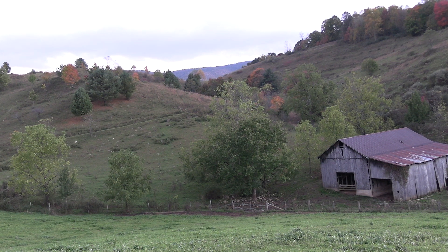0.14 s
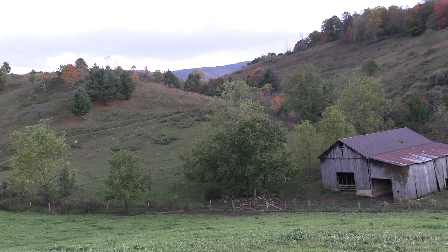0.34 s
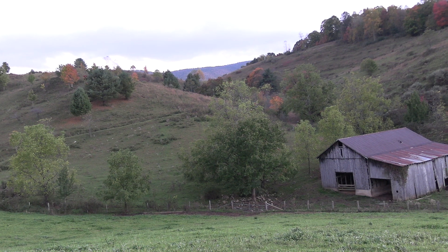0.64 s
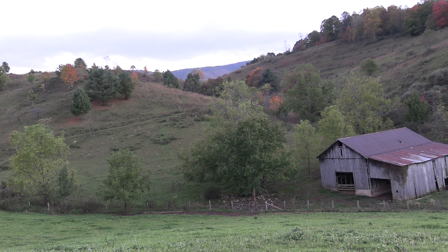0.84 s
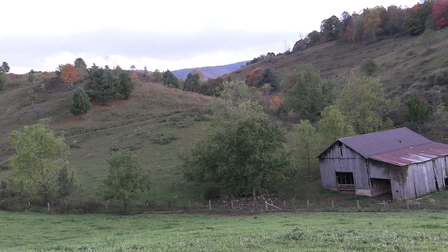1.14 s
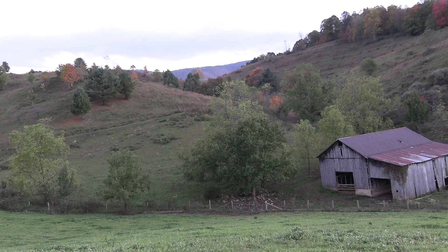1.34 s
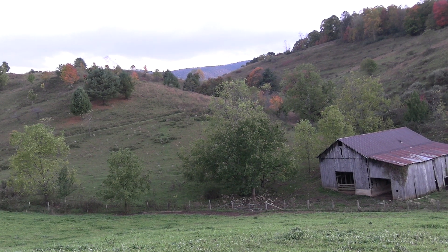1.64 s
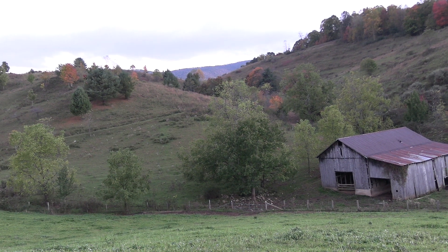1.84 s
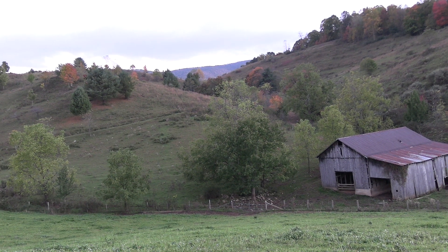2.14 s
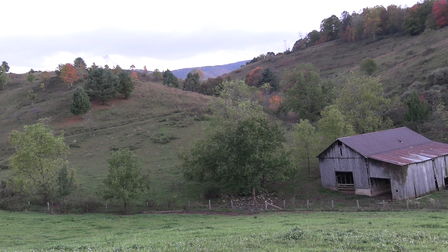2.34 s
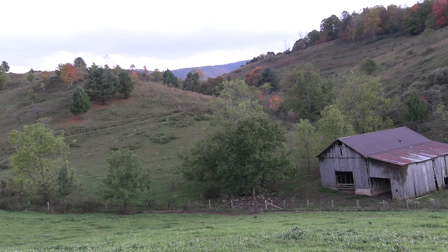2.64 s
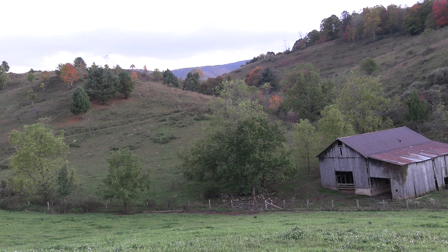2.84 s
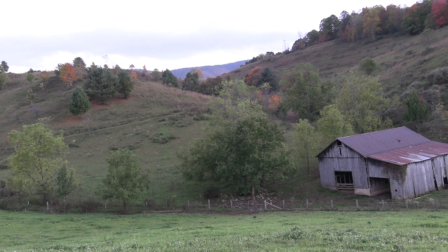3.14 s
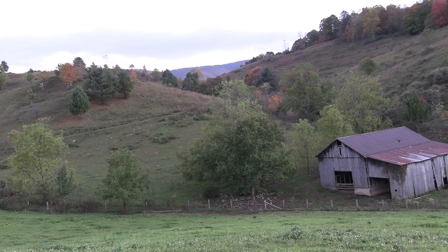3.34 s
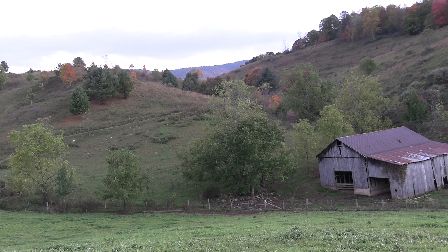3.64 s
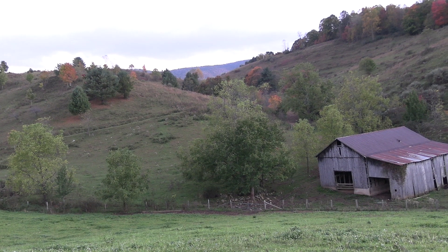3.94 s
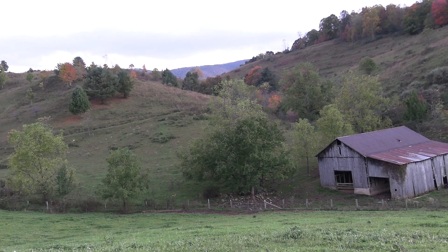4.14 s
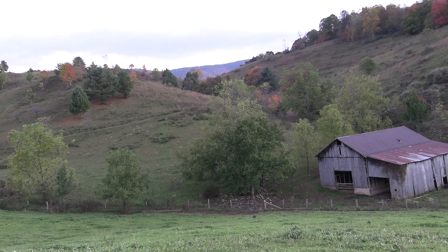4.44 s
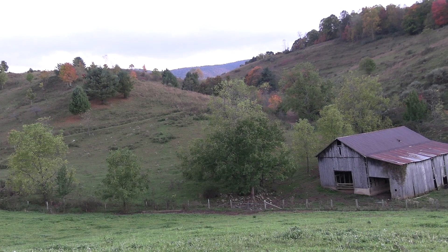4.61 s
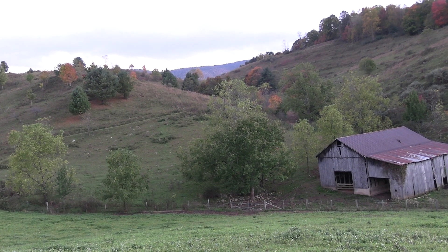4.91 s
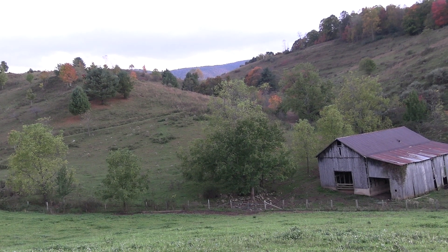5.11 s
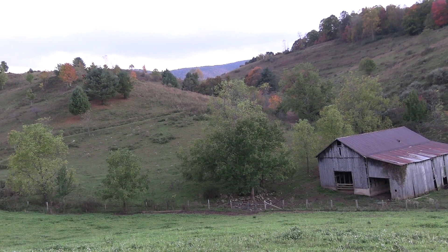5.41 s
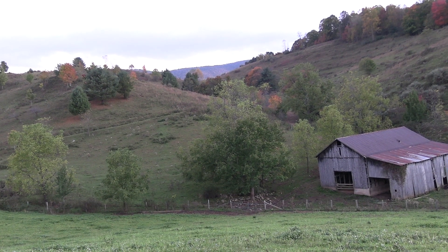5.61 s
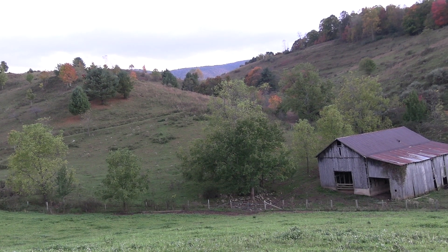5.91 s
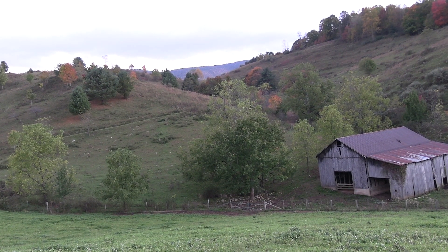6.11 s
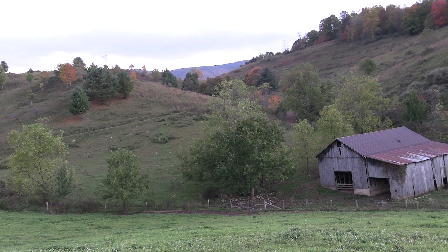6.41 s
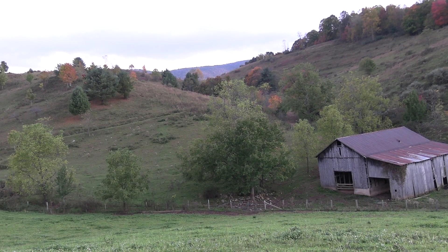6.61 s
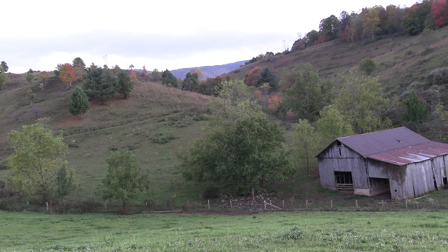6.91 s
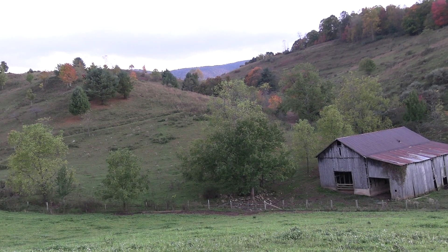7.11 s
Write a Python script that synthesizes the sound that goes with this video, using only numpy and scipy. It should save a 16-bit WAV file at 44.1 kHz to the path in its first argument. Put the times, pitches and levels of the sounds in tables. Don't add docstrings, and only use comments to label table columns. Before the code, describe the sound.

Dusk pasture: short crickets trills and tiny bird chips over faint air, broken by a lone coyote's bark, wavering high howl and final bark.

```python
import sys
import numpy as np
from scipy import signal
from scipy.fft import rfft, irfft
from scipy.io import wavfile
from scipy.ndimage import uniform_filter1d, minimum_filter1d

SR = 44100
rng = np.random.default_rng(int(sys.argv[2]) if len(sys.argv) > 2 else 0)


def volts_from_decibels(level):
    exponent = np.asarray(level, float) / 20
    return 10 ** exponent


def pcm_store(signal):
    levels = np.round(np.clip(np.atleast_2d(signal), -1, 1) * 32767)
    wavfile.write(sys.argv[1], SR, levels.astype(np.int16).T)


N = 320386

# (time [s], pitch [Hz], level [dB], mouth opening [dB])
BARK_END = [(4.145, 509, -31.5, 3), (4.158, 530.4, -21.5, -1.5), (4.184, 537, -20.5, -6),
            (4.226, 505, -23, -6), (4.246, 428, -43, 17.5), (4.262, 533, -36, -13)]
YIP = [(4.264, 542, -49, -13.5), (4.274, 697, -37.5, -5.5), (4.285, 750, -42, 1.5), (4.326, 873, -23, -2.5),
       (4.334, 826, -32.5, 2)]
DIP = [(4.339, 674, -28, 0), (4.387, 653.7, -23, 4), (4.414, 586, -27, -8.5), (4.43, 540, -24, -3.5),
       (4.471, 525, -19.5, 0), (4.489, 560, -17.5, -2.5)]
RISE = [(4.504, 613, -27.5, 4.9), (4.518, 656.5, -24, 6.6), (4.541, 699, -23, 2.31),
        (4.561, 739, -22.5, 4.9), (4.598, 787, -23.5, 4.7), (4.611, 804, -16, 4.5)]
HIGH = [(4.612, 714, -13, -8), (4.686, 755, -11, -11), (4.72, 774, -12.5, -2), (4.752, 765, -12, 4),
        (4.79, 732, -11.5, -4), (4.822, 720, -12, 6), (4.862, 744, -11, -2), (4.895, 740, -11.5, -2),
        (4.922, 706, -15, 8)]
YODEL = [(4.925, 710, -7, 12), (4.957, 676, -16, 7.5), (4.98, 721, -15, 1), (5.0, 677, -14.5, 4.5),
         (5.014, 687, -12, -1), (5.045, 670.4, -15.5, 5), (5.101, 678, -14, 0.5), (5.129, 662.3, -27, 7)]
LONG = [(5.108, 1168, -17, -16), (5.129, 1119, -18.5, -4.5), (5.165, 1110, -18.5, -5),
        (5.185, 1093, -18, 1.5), (5.316, 1079, -17.5, 1.5), (5.416, 1046, -17, 0), (5.43, 1044, -18, -5.5)]
FADE = [(5.435, 1037, -20.5, 1.9), (5.489, 1029, -24, 0.98), (5.501, 1017, -26, 1.8)]
DROP = [(5.506, 1004, -30, -5), (5.52, 901, -36.5, 14), (5.54, 650.6, -32.5, 3), (5.568, 548, -65, 6)]
LAST_BARK_TONE = [(6.075, 577, -20, 1), (6.108, 582.4, -18, 1), (6.115, 596, -16, 0), (6.12, 574, -18, -6),
                  (6.138, 561, -37.5, 2), (6.15, 571, -40, -5), (6.176, 571, -44, -10)]
PHRASES = [BARK_END, YIP, DIP, RISE, HIGH, YODEL, LONG, FADE, DROP, LAST_BARK_TONE]
BREATHS = [
    (0, 6),
    (6, 9),
    (9, 10),
]
LEADS = [1, 1, 1, 1, 2, 2, 1, 1, 1, 1]
HOARSENESS = [.02, .04, .012, .065, .026, .07, .02, .02, .07, .15]
# (first [dB], second [dB], third [dB], fourth [dB])
REGISTERS = [(-3, -7, -15, -17.5), (-2, -17.5, -37, -38), (-0.5, -14, -7, -26.5), (1.5, 2.5, -16.5, -30.5),
             (-21, 0.5, -21, -25), (-16.5, 3.5, -19, -17.5), (0.5, -28, -9.5, -39.5),
             (2, -18.5, -25.5, -40.5), (4.5, -4.5, -26, -50), (-2.5, -37, -33.5, -45)]
# (half-pitch lines [dB], partials above fourth [dB], top gain [dB per dB opening],
# top gain [dB per 100 Hz tension])
FOLDS = [(-30.5, -19, 1.41, 2.8), (-44, -38.5, 3, .1), (-55.5, -4.5, 1.5, -5.5), (-5, 4.5, 2.5, 1.5),
         (-25.5, 1.5, 0, 18), (-16.5, -5, 1.3, -8.5), (-41, 25, 0, -10), (-52, -20, 3, -5.5),
         (-56, -26, -1, -3), (-40, -8, -3, -3)]
# (time [s], added hoarseness [0-1], width [s])
CRACKS = [
    (4.15, .25, .03),
    (4.507, .07, .008),
    (4.609, .2, .005),
    (4.93, .04, .012),
    (5.13, .05, .02),
    (5.565, .15, .025),
]
# (time [s], dip [dB], restart [Hz])
BREAKS = [(4.924, -5, 680), (4.937, -14, 650), (4.951, -14, 655), (4.964, -8, 660), (4.969, -7, 730),
          (4.986, -6, 690), (5.009, -8, 700), (5.015, -15, 715), (5.040, -16, 680), (5.053, -11, 700),
          (5.059, -6, 715), (5.075, -9, 610), (5.086, -8, 715), (5.093, -15, 720), (5.099, -8, 700),
          (5.112, -12, 600)]
BREAK_RASP_DB = [-2, -3, 1.5, 6, -9, 3.5, 12.5, -1, -2, 9, -5, -9.5, -3.5, -5.5, -1.5, -2]
SAG_HZ, SAG_BRIGHT_DB = 590, 13
# (start [s], end [s], rate [Hz], third-partial depth [dB])
FLUTTER = (5.132, 5.195, 92, 9)
# (start [s], end [s])
STRAINED = (4.495, 4.612)
# (frequency [Hz], level [dB])
THROAT = [(2400, -2), (2850, -10), (3450, 2), (4050, -4), (4550, -12), (4950, -28), (5450, -26),
          (6200, -42)]
NOSE_HZ, NOSE_WIDTH_HZ, NOSE_DB = 2406, 180, -7
RASP_HZ, RASP_WIDTH_HZ, RASP_DB, RASP_EDGE_HZ, RASP_CUT_DB = 3470, 360, 8, 4230, -18

# (start [s], full effort due [s], end [s], chest level [dB], fold pulses [Hz])
BARKS = [(.229, .292, 0.32, -37, 740), (4.097, 4.176, 4.235, -25.5, 541.3),
         (6.037, 6.123, 6.138, -24.5, 563), (.208, .228, 0.21, -58, 900), (5.82, 10, 5.865, -59, 730)]
# (swell after attack [dB], fall to end [dB], mouth re chest [dB], teeth re chest [dB],
# mouth gain [dB per dB swell])
JAWS = [(1, 18.5, -8, -17.5, 8), (7, 14, 2.5, -16, 0.4), (6, 13, 6.5, -12.5, 1.4), (3, 9.5, 8, 6, -1.5),
        (7.5, 18, 9, -2, -1)]
HOLDS_S = [0.014, .03, 0.023, .004, .004]
# (time [s], level [dB], teeth level [dB])
JAW_SNAPS = [(0.2427, -27.5, -4.5), (.26, -28.5, -20), (.2765, -27.5, -30), (.2815, -26.5, -29),
             (.2865, -31.5, -30), (4.107, -26, -20), (4.1335, -25, -24), (4.1435, -23.5, -11),
             (4.1538, -18, -2), (4.1685, -16.5, -10), (4.176, -26.5, -14), (6.0485, -21, -32),
             (6.0685, -18, -25), (6.0927, -18.5, -12), (6.1035, -22, 6), (6.1175, -17, 5.5)]
# (frequency [Hz], width [Hz], level [dB])
CHEST = [(526, 39, 13.5), (800, 140, 3.5)]
MOUTH = [(970, 260, 0.5), (1426, 140, 1.5), (1755, 89, -3.5), (2143, 1200, -19.5)]
TEETH = [(3350, 93, -5.5), (4020, 590, -19.5)]
BARK_ATTACK_S, BARK_ATTACK_DB = 0.011, 7
CHEST_PULSE_HZ = 560
CHEST_FOLLOWS, TEETH_FOLLOWS = 0.34, 1.8

VALLEY_T60_S, VALLEY_DB, VALLEY_RISE_S, VALLEY_CUT_HZ = 5.47, -24.5, 0.66, 2850
EARLIER_DB, EARLIER_T60_S = -59, 4.4
# (delay [s], level [dB])
HILL_ECHOES = [
    (.4, -29.5),
    (0.428, -48.5),
    (1.42, -64),
]

# (first pulse [s], last pulse [s], pulses [count])
NEAR_TRILLS = [(.501, .608, 6), (1.025, 1.18, 8), (1.591, 1.745, 8), (2.213, 2.36, 8), (2.795, 2.948, 8),
               (3.335, 3.55, 11), (4.704, 4.832, 7), (5.457, 5.603, 8), (6.169, 6.318, 8),
               (6.808, 6.984, 9)]
FADING_TRILL = [(3.568, 3.655, 5)]
GLIDE_TRILLS = [(.758, 1.002, 12), (2.617, 2.835, 11), (4.512, 4.687, 9), (5.146, 5.411, 13),
                (5.892, 6.202, 15), (6.937, 7.224, 14)]
FAINT_TRILLS = [(1.199, 1.31, 6), (1.772, 1.816, 3), (2.139, 2.182, 3), (3.048, 3.159, 6), (3.946, 4.08, 7),
                (4.385, 4.475, 5), (6.502, 6.588, 5)]
# (time [s], rms level [dB])
RISING_CHIPS = [(.682, -54), (2.586, -48.5), (4.688, -44), (6.607, -49.5)]
FOLDED_CHIPS = [(.322, -55.5), (.726, -54), (2.252, -52.5), (4.441, -47), (5.694, -48), (6.722, -49)]
# (delay [s], level [dB])
GRASS_ECHOES = [(.0042, -17), (.0083, -21), (.013, -23)]

# (frequency [Hz], width [Hz], level [dB])
CHORUS = [(1659, 120, -8.5), (3090, 290, -9.5), (3240, 71, 0), (5270, 510, -18.5)]
# (time [s], level [dB])
CHORUS_LEVEL = [(0.4, -64.5), (0.852, -61), (1.45, -62.5), (2.03, -55), (2.76, -62), (3.33, -59.5),
                (4.05, -59.5), (6.5, -57.5), (6.652, -62.5), (7.202, -60.5)]
# (frequency [Hz], density [dB per Hz])
AIR = [(12, -41.5), (22, 3.5), (122, -11.5), (352, -16.5), (1070, -21), (1900, -24), (2750, -30.5),
       (3000, -12.5), (4100, -22.5), (4700, -32.5), (5400, -27), (15600, -37.5)]
AIR_DB = -51.5
# (time [s], peak level [dB], frequency [Hz])
KNOCKS = [(0.883, -36, 112), (0.886, -42, 312), (1.311, -40, 90), (1.314, -46.5, 240), (4.269, -42.5, 227)]
# (start [s], end [s], frequency [Hz], wander [Hz], rms level [dB])
DRONES = [
    (3.05, 4.052, 899, 15.8, -74.5),
    (6.4, 7.19, 139.4, 4.84, -61),
]


def rms_one(x):
    return x / np.sqrt(np.mean(np.abs(x) ** 2) + 1e-20)


def drift(rate_hz, size=N):
    r = np.exp(-2 * np.pi * rate_hz / SR)
    noise = rng.standard_normal(size + 20000)
    return rms_one(signal.lfilter([1], [1, -2 * r, r * r], noise)[20000:])


def bell(x):
    return np.exp(-x ** 2)


def band(x, order, low_hz, high_hz):
    return signal.sosfilt(signal.butter(order, [low_hz, high_hz], "band", fs=SR, output="sos"), x)


def resonate(x, modes):
    out = 0
    for k, (hz, width_hz, db) in enumerate(modes):
        r = np.exp(-np.pi * width_hz / SR)
        poles = [1, -2 * r * np.cos(2 * np.pi * hz / SR), r * r]
        out = out + (-1) ** k * volts_from_decibels(db) * signal.lfilter([1 - r * r, 0, r * r - 1], poles, x)
    return out


def played(rows, fade_s):
    s, *columns = np.transpose(rows)
    at = round(s[0] * SR)
    t = np.arange(at, round(s[-1] * SR)) / SR
    fade = np.clip(np.minimum(t - t[0], t[-1] - t) / fade_s, 0, 1)
    return at, t, [np.interp(t, s, c) for c in columns], fade


def add(out, at, x):
    out[at:at + len(x)] += x[:N - at]


def sung(k):
    half_db, upper_db, follows, tension_db = FOLDS[k]
    lift = (np.arange(1, 5) != LEADS[k]) * np.array([1, 1, 1, follows])
    mean_hz = np.mean(PHRASES[k], axis=0)[1]
    rows = []
    for s, hz, db, open_db in PHRASES[k]:
        tension = np.array([0, 0, 0, tension_db * (hz - mean_hz) / 100])
        partials_db = db + np.array(REGISTERS[k]) + open_db * lift + tension
        odd_db = open_db * (PHRASES[k] is HIGH)
        rows.append((s, hz, HOARSENESS[k], half_db, upper_db, odd_db, *partials_db))
    return rows


def throat(hz):
    return np.interp(hz, *np.transpose(THROAT))


def vocal_tract(k, hz, yodel, strain):
    db = throat(hz) * (k > 4) + NOSE_DB * bell((hz - NOSE_HZ) / NOSE_WIDTH_HZ)
    db = db - 8.2 * yodel * bell((hz - 2850) / 200)
    ring_db = RASP_DB * bell((hz - RASP_HZ) / RASP_WIDTH_HZ)
    return db + strain * (ring_db + RASP_CUT_DB / (1 + np.exp((RASP_EDGE_HZ - hz) / 80)))


def howl():
    out = np.zeros(N)
    break_s, _, restart_hz = np.transpose(BREAKS)
    start, end, flutter_hz, depth_db = FLUTTER
    for first, last in BREATHS:
        rows = sum(map(sung, range(first, last)), [])
        long_note = PHRASES[first] is LONG
        at, t, columns, fade = played(rows, .005)
        pitch, rough, half_db, upper_db, odd_db, *levels = columns
        size = len(t)
        rough = rough + sum(more * bell((t - s) / width_s) for s, more, width_s in CRACKS)

        turn = np.interp(t, break_s, np.arange(len(BREAKS)))
        latest, sag = turn.astype(int), turn % 1
        yodel = (turn > 0) & (pitch < 800) & (t < YODEL[-1][0])
        slide = restart_hz[latest] * (1 - sag) + SAG_HZ * sag
        steady = uniform_filter1d(pitch, size=500)
        pitch = uniform_filter1d(np.where(yodel, slide, steady), size=130)
        strained = yodel | (t > STRAINED[0]) & (t < STRAINED[1])
        strain = uniform_filter1d(1. * strained, size=200)
        jitter = 1 + 0.26 * rough * drift(180, size=size)
        low, phase = 2 * np.pi * np.cumsum(np.array([steady, pitch]) * jitter, axis=1) / SR

        bright_db = uniform_filter1d(SAG_BRIGHT_DB * (sag - .5) * yodel, size=60)
        rasp_db = uniform_filter1d(np.array(BREAK_RASP_DB)[latest] * yodel, size=90)
        if long_note:
            wave = np.cos(2 * np.pi * flutter_hz * np.maximum(t - start, -.5 / flutter_hz)) - .5
            bright_db = bright_db + depth_db * np.clip((end - t) / .03, 0, 1) * wave
            wave = np.cos(2 * np.pi * flutter_hz * np.maximum(t - start, -.25 / flutter_hz)) - .3
            fade = fade * volts_from_decibels(2.5 * np.clip((end - .03 - t) / .04, 0, 1) * wave)
        else:
            for s, dip_db, _ in BREAKS:
                fade = fade * volts_from_decibels(dip_db * np.exp(-np.abs(t - s) / np.where(t > s, .0026, .001)))
                rasp_db = rasp_db + .8 * dip_db * bell((t - s - .0015) / .0028)

        levels += [levels[3] + upper_db - 1.8 * (k - 5) + odd_db * (k % 2) for k in range(5, 9)]
        for k in range(len(levels)):
            bright_share = min(.15 + .45 * k, 1) * (k != 1 or long_note)
            levels[k] = levels[k] + bright_db * bright_share + rasp_db * np.clip(k / 3 - 1 / 3, 0, 1)

        ragged = 1.5 * np.clip(-odd_db / 15, 0, 1)
        voice = 0
        for k, db in enumerate(levels, 1):
            tract_db = vocal_tract(k, k * pitch, yodel, strain)
            wander_db = 0.6 * (k - 1.5) * drift(12, size=size)
            shake = rough * (1 + k * k / 6) / 2 + ragged / k * (k % 2)
            shaken = 1 + shake * drift(320, size=size)
            tone = np.sin((k * phase if k > 1 else low) + k * k)
            voice = voice + volts_from_decibels(db + tract_db + wander_db) * shaken * tone
        for k, (below, above) in enumerate(zip(levels[:5], levels[1:]), 1):
            line_db = (below + above) / 2 + half_db + throat((k + .5) * pitch) * (k > 3)
            voice = voice + volts_from_decibels(line_db) * np.sin((k + .5) * phase)
        add(out, at, np.sqrt(2) * voice * fade)
    return out


def barks():
    out = np.zeros(N)
    for bark, jaws, hold_s in zip(BARKS, JAWS, HOLDS_S):
        start, top, end, db, pulse_hz = bark
        swell_db, fall_db, mouth_db, teeth_db, follows = jaws
        # (time [s], effort [dB], gape [dB])
        shape = [(start, -swell_db - BARK_ATTACK_DB, -swell_db),
                 (start + BARK_ATTACK_S, -swell_db, -swell_db),
                 (top - hold_s, 0, 0), (top, 0, 0), (end, -fall_db, -swell_db)]
        at, t, (effort_db, gape_db), fade = played(shape, 0.0022)
        size = len(t)
        cycles = np.cumsum(pulse_hz * (1 + .12 * drift(120, size=size))) / SR
        slaps = np.diff(np.floor(cycles), prepend=0) * volts_from_decibels(3.0 * drift(200, size=size))
        breath = 0.67 * rng.standard_normal(size) * volts_from_decibels(1.7 * drift(83, size=size))
        source = rms_one(slaps) + breath
        ratio = pulse_hz / CHEST_PULSE_HZ
        chest = resonate(source, np.array(CHEST) * [ratio, ratio ** 4, 1])
        chest = rms_one(resonate(chest, [(600, 3900, 0)]))
        mouth = rms_one(band(resonate(source, MOUTH), 2, 850, 2600))
        teeth = rms_one(band(resonate(source, TEETH), 3, 2900, 4300))
        body = volts_from_decibels(CHEST_FOLLOWS * gape_db) * chest
        body = body + volts_from_decibels(mouth_db + follows * gape_db) * mouth
        body = body + volts_from_decibels(teeth_db + TEETH_FOLLOWS * gape_db) * teeth
        add(out, at, volts_from_decibels(db + effort_db) * fade * body)
    slap = bell(np.arange(900) / 4.3 - 3) / 6
    for s, db, teeth_db in JAW_SNAPS:
        modes = [(540, 100, 3.5), (800, 240, -2.0)] + MOUTH + [(3300, 300, teeth_db)]
        add(out, round(s * SR), volts_from_decibels(db) * 20 * resonate(slap, modes))
    return out


def valley(x):
    t = np.arange(N) / SR
    scatter = rng.standard_normal(N) * volts_from_decibels(3 * drift(9))
    scatter *= volts_from_decibels(-60 * t / VALLEY_T60_S) * (1 - np.exp(-t / VALLEY_RISE_S))
    scatter *= volts_from_decibels(VALLEY_DB) / np.sqrt(np.sum(scatter ** 2))
    for s, db in HILL_ECHOES:
        add(scatter, round(s * SR), volts_from_decibels(db) * rms_one(rng.standard_normal(900)) / 30)
    earlier = rms_one(resonate(rng.standard_normal(N), [(1140, 160, 0), (1480, 170, 0)]))
    earlier = earlier * volts_from_decibels(EARLIER_DB - 60 * t / EARLIER_T60_S)
    return earlier + band(signal.fftconvolve(x, scatter)[:N], 2, 720, VALLEY_CUT_HZ)


def cricket(trills, db, from_hz, to_hz, stroke_s, slip_at, slip_width, octave_db,
            tick_at, tick_db, tail, clipped=0):
    out, u = np.zeros(N), np.linspace(0, 1, round(stroke_s * SR))
    for first, last, count in trills:
        times = np.linspace(first, last, count)
        times = np.append(times[0] - 0.44 * (times[1] - times[0]), times)
        chances = rng.standard_normal((count + 1, 4))
        for k, (s, chance) in enumerate(zip(times, chances)):
            hz = (from_hz + (to_hz - from_hz) * u) * (1 + 0.004 * chance[0])
            phase = 2 * np.pi * np.cumsum(hz) / SR
            slip = (u - slip_at - 0.05 * chance[1]) / (slip_width * volts_from_decibels(1.5 * chance[3]))
            cut = np.tanh(slip * np.where(slip > 0, 2.2, 1)) ** 3 * np.where(slip > 0, 1, 0.7)
            edges = np.clip(np.minimum(u / .07, (1 - u) / tail), 0, 1)
            if k == count:
                edges = edges * (1 - clipped * np.clip(5 - 10 * u, 0, 1))
            if k == 0:
                edges = edges * (1 - np.clip(4 * u - .5, 0, 1))
            stroke = edges * cut * np.sin(phase)
            stroke += volts_from_decibels(octave_db) * (k > 0) * np.sin(np.pi * u) * np.sin(2 * phase)
            tick = bell((u - tick_at) / 0.04) * np.sin((1.16 + .04 * chance[1]) * phase)
            stroke += volts_from_decibels(tick_db) * tick
            at = round((s - stroke_s / 2 - .001 + .0006 * chance[3]) * SR)
            add(out, at, volts_from_decibels(db + 1.2 * chance[2] - 3 * (k == 0)) * stroke)
    return out


def crickets():
    near = cricket(NEAR_TRILLS, -45, 7430, 7270, .0086, .42, 0.14, -27, .5, -9, .16, clipped=1)
    fading = cricket(FADING_TRILL, -48, 7400, 6900, 0.006, 0.5, 0.12, -29, .45, -10, .2)
    glide = cricket(GLIDE_TRILLS, -51.5, 7700, 6880, .0098, .36, .2, -9.5, .08, -4, .1)
    faint = cricket(FAINT_TRILLS, -58.5, 6700, 6780, 0.0066, -.3, .1, -35, .1, -36, .15)
    return near + fading + glide + faint


def bird():
    out = np.zeros(N)
    kinds = ((RISING_CHIPS, [4970, 7000, 7000, 7660], .022),
             (FOLDED_CHIPS, [8950, 6500, 4960, 6040, 8000], .016))
    for chips, shape_hz, length_s in kinds:
        u = np.linspace(0, 1, round(length_s * SR))
        sweep_hz = np.interp(u, np.linspace(0, 1, len(shape_hz)), shape_hz)
        tone = np.sin(2 * np.pi * np.cumsum(sweep_hz) / SR)
        turning = np.gradient(np.unwrap(np.angle(signal.hilbert(tone))))
        khz = turning * SR / (2 * np.pi) / 1000
        chip = 2 * tone * np.sin(np.pi * u ** .5) * volts_from_decibels(-9.0 * (khz - 5) / 2)
        for s, db in chips:
            add(out, round(s * SR), volts_from_decibels(db) * chip)
    return out


def grass(x):
    out = x.copy()
    for s, db in GRASS_ECHOES:
        add(out, round(s * SR), volts_from_decibels(db) * x)
    return out


def chorus():
    db = np.interp(np.arange(N) / SR, *np.transpose(CHORUS_LEVEL))
    bands = 0
    for mode in CHORUS:
        throb = volts_from_decibels(3.3 * drift(32) + 0.67 * drift(1.5))
        insects = resonate(rng.standard_normal(N), [mode])
        bands = bands + throb * resonate(insects, [(mode[0], 2 * mode[1], 0)])
    return volts_from_decibels(db) * rms_one(bands)


def drones():
    out = np.zeros(N)
    for start, end, drone_hz, wander_hz, db in DRONES:
        size = round((end - start) * SR)
        hz = drone_hz + wander_hz * drift(5.5, size=size)
        tone = np.sin(2 * np.pi * np.cumsum(hz) / SR)
        level = volts_from_decibels(db + 0.57 * drift(39, size=size))
        add(out, round(start * SR), level * tone * 2 * np.hanning(size) ** 0.064)
    return out


def knocks():
    out, t = np.zeros(N), np.arange(3000) / SR
    for s, db, hz in KNOCKS:
        add(out, round(s * SR), volts_from_decibels(db) * np.sin(2 * np.pi * hz * t) * np.exp(-t / 0.0097))
    return out


def air():
    hz = np.fft.rfftfreq(N, 1 / SR) + 1
    points_hz, points_db = np.transpose(AIR)
    shape_db = np.interp(np.log(hz), np.log(points_hz), points_db)
    ambience = rms_one(irfft(rfft(rng.standard_normal(N)) * volts_from_decibels(shape_db), N))
    wind = rms_one(band(rng.standard_normal(N), 2, 18, 130))
    return volts_from_decibels(AIR_DB - 3.5) * ambience + volts_from_decibels(-58.0 + 1.0 * drift(0.82)) * wind


def scene():
    coyote = band(howl() + barks(), 5, 425, 6000)
    close = grass(crickets() + bird())
    background = chorus() + drones() + knocks() + air()
    return (coyote + valley(coyote) + close + background)[None]


def low_pass(x):
    return signal.sosfilt(signal.butter(12, 15700, fs=SR, output="sos"), x)


def record(dry):
    gain = minimum_filter1d(np.minimum(1, .53 / (np.abs(dry) + 1e-9)), size=133)
    return low_pass(dry * uniform_filter1d(gain, size=133))


dry = scene()
out = record(dry)
pcm_store(out)
```